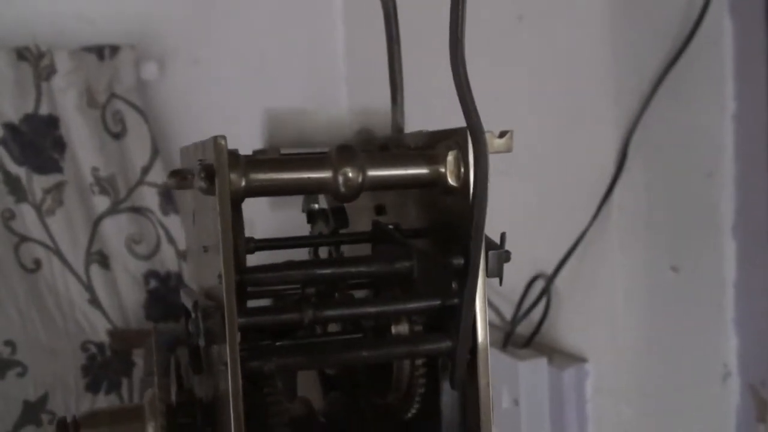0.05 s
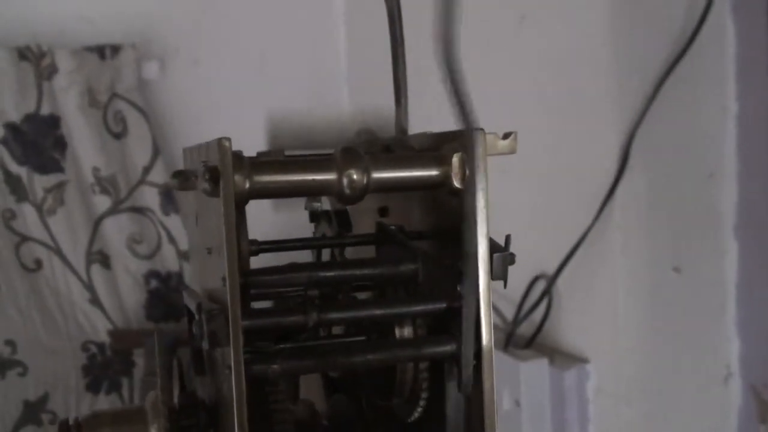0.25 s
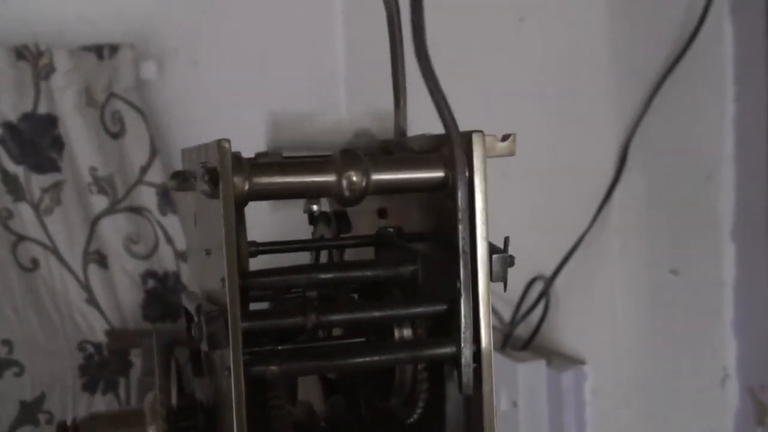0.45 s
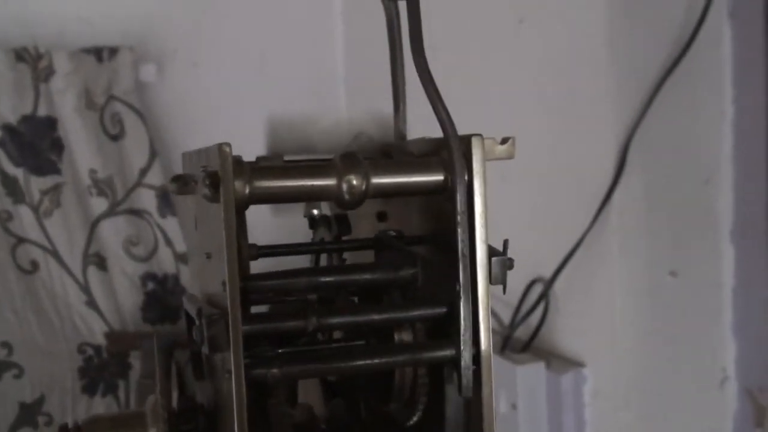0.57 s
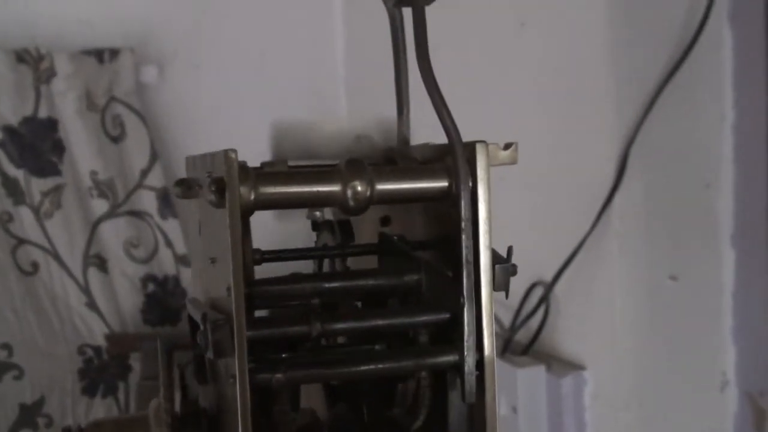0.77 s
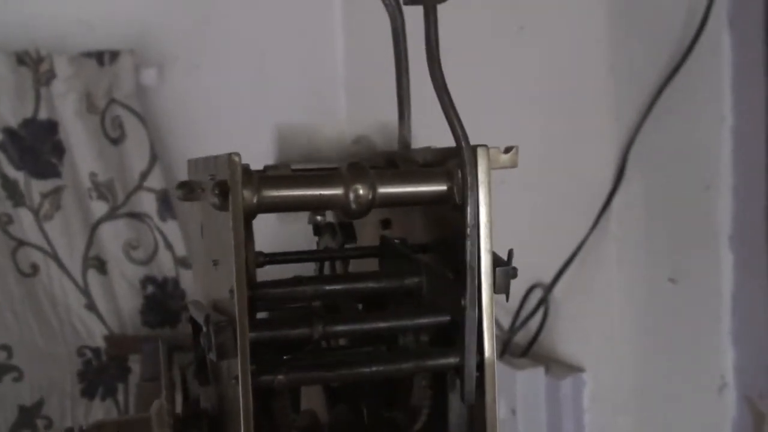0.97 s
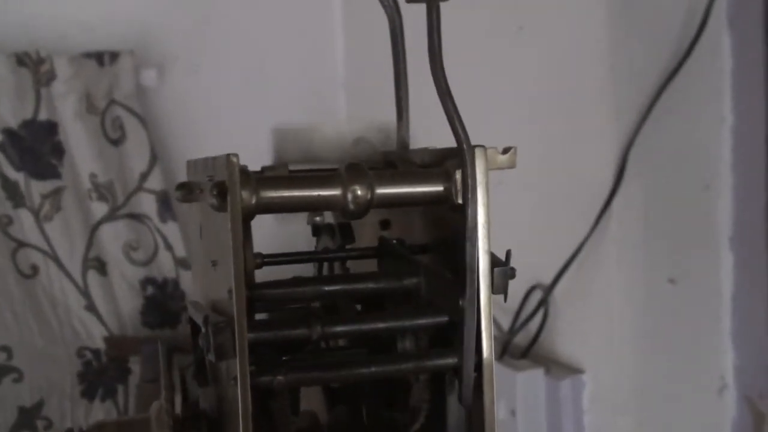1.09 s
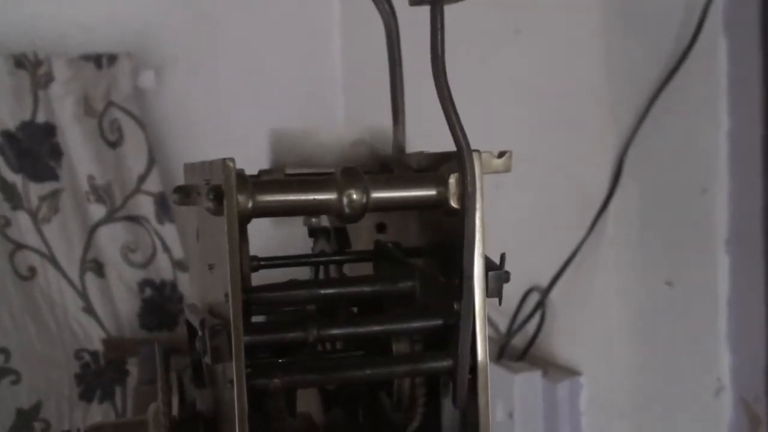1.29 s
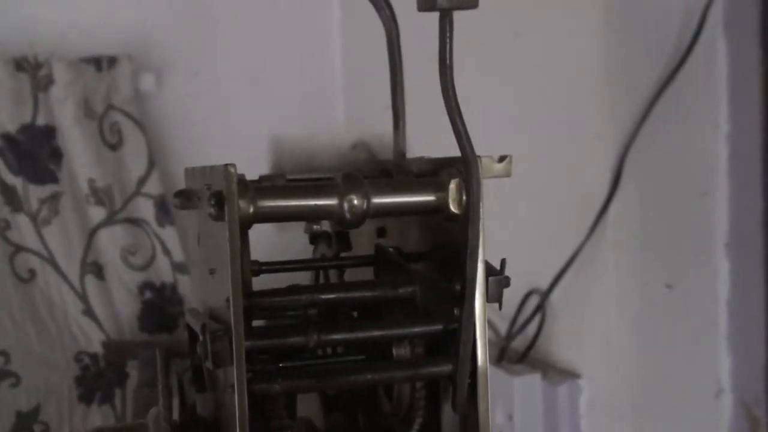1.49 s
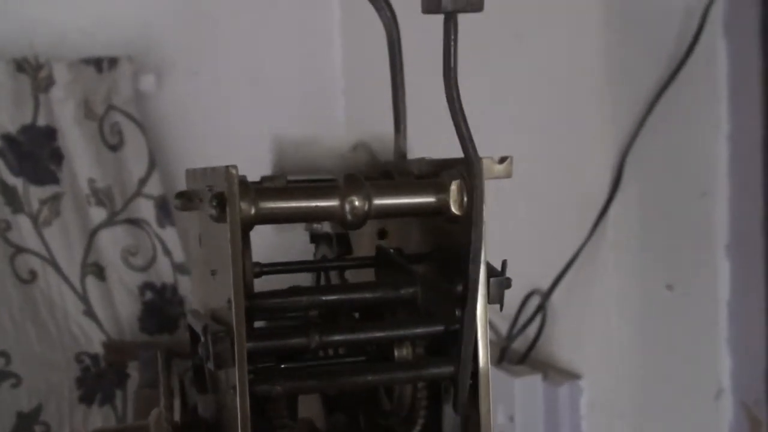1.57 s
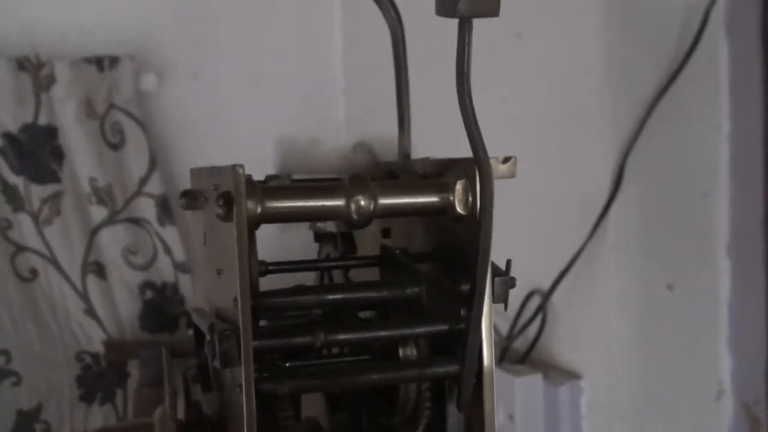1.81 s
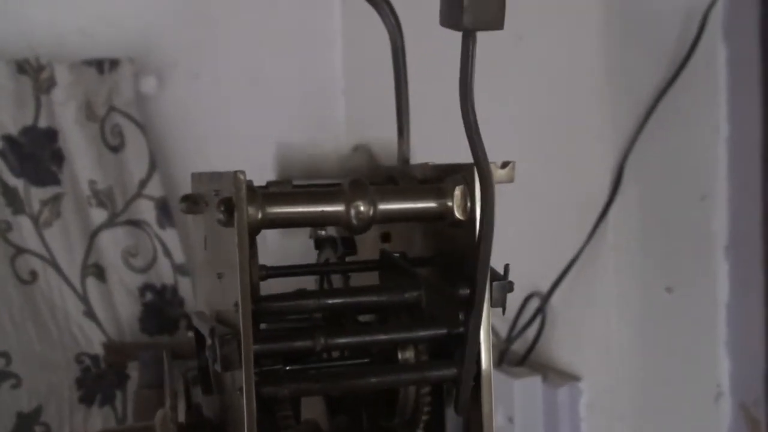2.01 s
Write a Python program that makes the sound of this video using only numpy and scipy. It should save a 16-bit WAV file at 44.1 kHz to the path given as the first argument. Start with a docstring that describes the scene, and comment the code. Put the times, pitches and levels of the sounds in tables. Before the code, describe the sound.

A clock movement runs close up in a small room, with dull ticks about every 0.26 seconds under fast, bright wheel chatter. Two hard metal clacks hit at 0.33 and 0.4 seconds. Gritty scrapes and a thin, high pivot squeal flicker most strongly from 0.3 to 1.1. Faint hollow knocks appear around 1.3 to 1.45; then the whir eases, leaving brighter tocks, small steel rings and faint hiss until 2.0.

```python
"""Loose wheels chatter and whir over a faint hiss while a clock escapement ticks, with brighter tocks.
Noise made of tiny contacts, coloured by resonances, makes the chatter, whir, rubs and scrapes.
One high tone swells: a dry pivot sings, and the rattle faintly excites the same tone.
Decaying sines make thin steel rings, the metal of two loud clacks and some soft hollow knocks.
The uneven whir gradually eases; a short diffuse tail and a second rendering give room and width."""
import sys
import numpy as np
from scipy.fft import rfft, irfft, next_fast_len
from scipy.io import wavfile

SR = 44100
rng = np.random.default_rng(int(sys.argv[2]) if len(sys.argv) > 2 else 0)


def log_audio(samples):
    """Write samples as a 16-bit WAV file to the path given in sys.argv[1]."""
    # one column per channel
    frames = np.atleast_2d(samples).T
    # limit to full scale, then quantise
    limited = np.clip(frames, -1, 1)
    pcm = np.round(limited * 32767).astype(np.int16)
    wavfile.write(sys.argv[1], SR, pcm)


N = 90404
T = np.arange(N) / SR
SIZE = next_fast_len(2 * N)  # padded, so that filter tails do not wrap round
HZ = np.maximum(np.arange(SIZE // 2 + 1) * SR / SIZE, 1)
ATTACK_S, GRAINS_PER_S, GRAIN_SPREAD_DB = 0.0013, 8000, 2


def from_db(db):
    """Logarithmic level: 20 dB is a factor of ten in amplitude."""
    return 10 ** (np.asarray(db) / 20)


def rms_one(x):
    """Normalisation: scale to unit root mean square."""
    return x / np.sqrt(np.mean(np.abs(x) ** 2) + 1e-20)


def through(x, response):
    """Linear filtering: multiply the spectrum by a frequency response."""
    return irfft(rfft(x, SIZE) * response, SIZE)[..., :N]


def colour(points):
    """Minimum phase: a causal response whose magnitude follows (pitch_hz, level_db) points."""
    hz, db = np.transpose(points)
    level_db = np.interp(np.log(HZ), np.log(hz), db)
    cepstrum = irfft(np.log(from_db(level_db)), SIZE)
    # fold the negative-time half onto the positive
    cepstrum[1:SIZE // 2] *= 2
    cepstrum[SIZE // 2 + 1:] = 0
    return np.exp(rfft(cepstrum))


def resonances(modes):
    """Modal superposition: damped oscillators (pitch_hz, width_hz, level_db) in parallel."""
    return sum(from_db(db) / (1 + 1j * (HZ ** 2 - hz ** 2) / (HZ * width)) for hz, width, db in modes)


def lifts(modes):
    """Resonant colouring: a flat response with a peak or dip at each mode."""
    return np.prod([1 + (from_db(db) - 1) * resonances([(hz, width, 0)]) for hz, width, db in modes],
                   axis=0)


def drift(rate_hz):
    """Random modulation: low-passed noise of unit rms."""
    return rms_one(through(rng.standard_normal(N), 1 / (1 + (HZ / rate_hz) ** 2) ** 2))


def grains():
    """Granular contact noise: dense random impulses of either sign and uneven size, at unit rms."""
    touch = rng.random(N) < GRAINS_PER_S / SR
    sign = rng.choice([-1, 1], N)
    return rms_one(touch * sign * from_db(GRAIN_SPREAD_DB * rng.standard_normal(N)))


def bursts(rows, t60_s, rise_s=ATTACK_S):
    """Incoherent addition: powers of (start_s, level_db, length_s) runs add, then shape the grains."""
    power = np.zeros(N)
    for start, db, length in rows:
        release = from_db(db - 60 * np.maximum(T - start - length, 0) / t60_s)
        rise = np.clip((T - start) / rise_s + .5, 0, 1)
        power += (release * rise) ** 2
    return np.sqrt(power) * grains()


def struck(start, db, t60_s, modes):
    """Free vibration: one blow sets modes (pitch_hz, level_db) ringing with exponential decay."""
    age = np.maximum(T - start, 0)
    envelope = np.minimum(age / ATTACK_S, 1) * from_db(db - 60 * age / t60_s)
    return envelope * sum(from_db(mode_db) * np.sin(2 * np.pi * (hz * age + rng.random()))
                          for hz, mode_db in modes)


# spectrum of the room's hiss and rumble: pitch_hz [Hz], relative level_db [dB]
HISS_COLOUR = [(22, 8), (32, 5), (47, 14.5), (62, 1), (125, 2), (180, -2.5), (600, 1.5), (2000, 2),
               (5000, -9), (15500, -5)]
HISS_DB = -58


def room_hiss():
    """Stationary noise: white noise takes the spectrum of the room's hiss and rumble."""
    return from_db(HISS_DB) * through(rng.standard_normal(N), rms_one(colour(HISS_COLOUR)))


# wheels chattering: start_s [s], treble level_db and mid-range level_db [dB before offsets], length_s [s]
CHATTER = [(0.03, -39.5, -72, 0.024), (0.098, -39.5, -49, 0.024), (0.129, -37, -43, 0.021),
           (0.1664, -37.5, -52, 0.013), (0.207, -34.5, -46, 0.024), (0.238, -37, -46, 0.017),
           (0.259, -34.5, -40.5, 0.015), (0.282, -30, -38, 0.0053), (0.295, -38, -58, 0.0094),
           (0.3218, -35, -31.5, 0.0047), (0.35, -30, -27.5, 0.0085), (0.373, -35.5, -40, 0.039),
           (0.434, -56, -38.5, 0.018), (0.4614, -35.5, -39.5, 0.0071), (0.469, -50, -35, 0.0048),
           (0.513, -29, -41, 0.011), (0.531, -34.5, -40, 0.024), (0.561, -34.5, -42, 0.023),
           (0.601, -30.5, -42, 0.021), (0.632, -31.5, -36.5, 0.017), (0.659, -33.5, -40, 0.017),
           (0.677, -45, -38.5, 0.0094), (0.698, -34.5, -37, 0.021), (0.74, -29.5, -57, 0.0082),
           (0.752, -33.5, -51, 0.014), (0.7777, -31, -36, 0.019), (0.812, -30, -35, 0.01),
           (0.8555, -26.5, -38, 0.005), (0.88, -34, -38.5, 0.015), (0.9117, -36.5, -41.5, 0.021),
           (0.939, -34.5, -43, 0.008), (0.959, -33.5, -45, 0.0078), (0.987, -35, -40.5, 0.0098),
           (0.997, -36.5, -40.5, 0.018), (1.026, -31, -41, 0.0095), (1.062, -33.5, -38, 0.012),
           (1.091, -33.5, -39.5, 0.015), (1.129, -34, -42, 0.0087), (1.155, -36, -42.5, 0.023),
           (1.1824, -32, -39.5, 0.011), (1.21, -35, -44.5, 0.018), (1.259, -40.5, -52, 0.02),
           (1.3063, -32, -41.5, 0.011), (1.331, -40, -40, 0.012), (1.352, -35.5, -59, 0.0067),
           (1.4078, -33.5, -49.5, 0.013), (1.448, -36.5, -42.5, 0.029), (1.482, -36.5, -43, 0.024),
           (1.535, -36, -44.5, 0.0085), (1.573, -36.5, -43, 0.0092), (1.596, -33.5, -40.5, 0.013),
           (1.6593, -31.5, -41.5, 0.01), (1.7, -40.5, -47, 0.016), (1.712, -40, -45, 0.015),
           (1.775, -41, -50, 0.021), (1.799, -33, -43.5, 0.0072), (1.833, -35, -50, 0.0056),
           (1.886, -41, -42, 0.01), (1.908, -39, -46.5, 0.023), (1.9374, -34.5, -46.5, 0.017),
           (1.968, -42.5, -43.5, 0.021), (2.0085, -38, -41.5, 0.024)]
CHATTER_TREBLE_OFFSET_DB, CHATTER_MID_OFFSET_DB, CROSSOVER_HZ = -11, -4.5, 6860
CHATTER_RISE_S, CHATTER_T60_S = 0.0058, 0.036
CHATTER_FLUTTER_DB, CHATTER_FLUTTER_HZ = 2.5, 400
# broad spectrum of the wheels: pitch_hz [Hz], relative level_db [dB]
WHEEL_COLOUR = [(100, -14), (220, -21.5), (340, -3.5), (700, -4), (1300, -3), (2000, 3.5), (2800, 0),
                (4300, 1.5), (5600, -1), (7400, -1), (8600, 0.5), (10000, 2), (11000, 0.5), (12800, -3),
                (15500, -2.5)]
# resonances of plates and wheels: pitch_hz [Hz], width_hz [Hz], lift_db [dB]
PLATE_MODES = [(1096, 20, 14.5), (1362, 12, 10), (1636, 16, 10), (2432, 79, -29), (3862, 17, 10),
               (4370, 32, 5), (4730, 27, 7.5), (5458, 29, 14.5), (5825, 40, 8), (6690, 27, 17.5),
               (10020, 240, 6)]
# extra treble resonances of the chatter: pitch_hz [Hz], width_hz [Hz], lift_db [dB]
TOOTH_MODES = [(9050, 270, 6), (9970, 280, 3.5), (9840, 78, 5.5)]
# continuous rub of the train, rising and falling: time_s [s], level_db [dB before offset]
WHIR = [(0, -45), (0.08, -55.5), (0.19, -47), (0.29, -41), (0.44, -40.5), (0.59, -46), (0.68, -44),
        (0.79, -43), (0.845, -47), (0.89, -44), (1.12, -46.5), (1.38, -47.5), (1.64, -58), (1.77, -48.5),
        (2.05, -57)]
WHIR_OFFSET_DB, WHIR_FLUTTER_DB, WHIR_FLUTTER_HZ, WHIR_TOP_HZ = -2.5, 2.5, 123, 10240


def wheels():
    """Source and resonator: contact noise of chatter and a continuous, uneven rub excites the plates."""
    body = rms_one(colour(WHEEL_COLOUR) * lifts(PLATE_MODES))
    low_power = 1 / (1 + (HZ / CROSSOVER_HZ) ** 8)
    flutter = from_db(CHATTER_FLUTTER_DB * drift(CHATTER_FLUTTER_HZ))
    treble_rows = [(s, db + CHATTER_TREBLE_OFFSET_DB, length) for s, db, _, length in CHATTER]
    middle_rows = [(s, db + CHATTER_MID_OFFSET_DB, length) for s, _, db, length in CHATTER]
    treble = flutter * bursts(treble_rows, CHATTER_T60_S, CHATTER_RISE_S)
    middle = flutter * bursts(middle_rows, CHATTER_T60_S, CHATTER_RISE_S)
    whir_db = np.interp(T, *np.transpose(WHIR)) + WHIR_OFFSET_DB
    rub = grains() * from_db(whir_db + WHIR_FLUTTER_DB * drift(WHIR_FLUTTER_HZ))
    out = through(treble, body * lifts(TOOTH_MODES) * np.sqrt(1 - low_power))
    out += through(middle, body * np.sqrt(low_power))
    return out + through(rub, body / np.sqrt(1 + (HZ / WHIR_TOP_HZ) ** 8))


# one pallet ticks, dull and short: start_s [s], level_db [dB]
TICKS = [(0.005, -45), (0.268, -49), (0.528, -46), (0.799, -45), (1.058, -44.5), (1.325, -47.5),
         (1.591, -45), (1.842, -44)]
# modes of the tick: pitch_hz [Hz], relative level_db [dB]
TICK_MODES = [(810, -6), (1650, -4), (1800, 2.5), (2690, -2.5)]
# the other pallet tocks, brighter: start_s [s], level_db [dB]
TOCKS = [(0.131, -52), (1.453, -51.5), (1.713, -48), (1.984, -50.5)]
# modes of the tock: pitch_hz [Hz], relative level_db [dB]
TOCK_MODES = [(1950, -1.5), (4230, 1), (4400, 5)]
PALLET_RING_T60_S = 0.036
PALLET_RUB_DB, PALLET_RUB_S, PALLET_RUB_T60_S, PALLET_RUB_WIDTH_HZ = -4, 0.0027, 0.07, 160


def escapement():
    """Impact and friction: each pallet landing rings its modes and rubs briefly along the tooth."""
    out = np.zeros(N)
    for beats, modes in ((TICKS, TICK_MODES), (TOCKS, TOCK_MODES)):
        rub = bursts([(s, db + PALLET_RUB_DB, PALLET_RUB_S) for s, db in beats], PALLET_RUB_T60_S)
        rub_modes = [(hz, PALLET_RUB_WIDTH_HZ, db) for hz, db in modes]
        out += through(rub, rms_one(resonances(rub_modes)))
        out += sum(struck(s, db, PALLET_RING_T60_S, modes) for s, db in beats)
    return out


# thin steel ring at some beats: start_s [s], level_db [dB], t60_s [s]
RINGS = [(0.008, -51, 0.79), (1.453, -42, 0.097), (1.591, -44, 0.1), (1.714, -42, 0.21), (1.841, -39.5, .1),
         (1.985, -48.5, 0.28)]
RING_HZ = 5300
WHEEL_RING_HZ, WHEEL_RING_DB, WHEEL_RING_T60_S = 4670, -0.5, 0.15  # level relative to the tock


def thin_ring():
    """Lightly damped modes: some beats ring a small steel part; each tock adds a second, lower ring."""
    steel = sum(struck(s, db, t60, [(RING_HZ, 0)]) for s, db, t60 in RINGS)
    wheel_modes = [(WHEEL_RING_HZ, WHEEL_RING_DB)]
    return steel + sum(struck(s, db, WHEEL_RING_T60_S, wheel_modes) for s, db in TOCKS)


# swells of one high tone, from the singing pivot or, faintly, the rattle:
# peak_s [s], level_db [dB], half_length_s [s]
TONE_SWELLS = [(0.04, -54.5, 0.024), (0.127, -51.5, 0.024), (0.293, -38, 0.017), (0.422, -40, 0.0061),
               (0.457, -48, 0.013), (0.536, -37.5, 0.018), (0.587, -41, 0.017), (0.653, -35.5, 0.013),
               (0.699, -38, 0.016), (0.757, -37, 0.018), (0.801, -43, 0.0077), (0.862, -41, 0.0079),
               (0.917, -43, 0.012), (0.963, -40.5, 0.021), (1.012, -43.5, 0.015), (1.062, -41.5, 0.011),
               (1.12, -45, 0.022), (1.233, -51, 0.017), (1.535, -55.5, 0.014), (1.291, -51.5, 0.017),
               (1.411, -53.5, 0.016), (1.466, -49.5, 0.017), (1.587, -48.5, 0.0096), (1.673, -45.5, 0.015),
               (1.951, -48, 0.0076)]
TONE_HZ, TONE_WANDER_HZ, TONE_WANDER_RATE_HZ = 6707, 9, 52.3
TONE_ROUGH_DB, TONE_ROUGH_RATE_HZ = 1.0, 200


def high_tone():
    """Excitation of one mode: a dry pivot sings by friction, and the rattle faintly excites the same tone."""
    swell = sum(from_db(db) * np.exp(-((T - peak) / half) ** 2) for peak, db, half in TONE_SWELLS)
    pitch = TONE_HZ + TONE_WANDER_HZ * drift(TONE_WANDER_RATE_HZ)
    phase = 2 * np.pi * np.cumsum(pitch) / SR
    roughness = from_db(TONE_ROUGH_DB * drift(TONE_ROUGH_RATE_HZ))
    return np.sqrt(2) * swell * roughness * np.sin(phase)  # root 2 gives the sine unit rms


# loud clacks: start_s [s], level_db [dB], length_s [s], rattle t60_s [s],
# colour as points of pitch_hz [Hz], relative level_db [dB]
CLACKS = [(0.3262, -23.5, 0.0038, 0.071, [(100, -20), (190, -18), (270, 5), (550, -3.5), (1500, -1),
          (2400, 6), (4400, 3), (7000, 11.5), (8200, 3.5), (11000, 5.5), (12500, -6), (14000, 5),
          (15500, 5)]), (0.401, -30.5, 0.0098, 0.082, [(100, -2.5), (190, -25), (290, -4), (1600, -5),
          (4400, 3.5), (7000, -1.5), (9000, 3.5), (11400, 9.5), (12400, -5.5), (15500, -0.5)])]
# what rings on, one list for each clack: pitch_hz [Hz], relative level_db [dB]
CLACK_MODES = [
    [(1075, -16.5), (2322, -6), (2408, -10), (3352, -15), (3756, -8.5), (4270, -10), (4476, -11),
     (5466, -18), (5747, -6), (6571, -19), (7212, -8), (9002, -12)],
    [(4474, -5), (9530, -8), (10282, -19), (11408, -4)],
]
CLACK_RING_T60_S = 0.084


def clacks():
    """Hard impact: two blows each give a short coloured rattle, and the struck metal rings on."""
    out = np.zeros(N)
    for (start, db, length, t60, points), modes in zip(CLACKS, CLACK_MODES):
        out += through(bursts([(start, db, length)], t60), rms_one(colour(points)))
        out += struck(start, db, CLACK_RING_T60_S, modes)
    return out


# teeth catch and scrape: start_s [s], level_db [dB], length_s [s]
SCRAPES = [(0.412, -30.5, 0.0036), (0.4775, -33, 0.0026), (0.526, -40, 0.0088), (0.668, -43.5, 0.0071),
           (0.725, -37.5, 0.0042), (0.869, -33, 0.0028), (0.896, -43.5, 0.009), (0.965, -45.5, 0.0048),
           (1.018, -44, 0.016), (1.098, -46.5, 0.011), (1.250, -49.5, 0.022), (1.330, -46, 0.0038)]
# modes of the scraped teeth: pitch_hz [Hz], width_hz [Hz], relative level_db [dB]
SCRAPE_MODES = [(3160, 2900, 1.7), (4620, 120, 13.3), (5110, 300, 13), (5463, 84, 18.7)]
SCRAPE_T60_S = 0.055


def scrapes():
    """Forced resonance: teeth catch for a moment and their contact noise drives a few modes."""
    return through(bursts(SCRAPES, SCRAPE_T60_S), rms_one(resonances(SCRAPE_MODES)))


# soft hollow knocks: start_s [s], level_db [dB], starting pitch_hz [Hz], t60_s [s]
KNOCKS = [(0.456, -48.5, 299.4, 0.13), (1.155, -58.5, 159.6, 0.6), (1.326, -52.5, 826, 0.2),
          (1.352, -53, 489, 0.23), (1.440, -52, 478, 0.23)]
# partials of a knock: multiple of the pitch [ratio], relative level_db [dB]
KNOCK_MODES = [(1, -5), (1.5, -10.5)]
KNOCK_RISE_S, KNOCK_SAG_HZ_PER_S, KNOCK_FLUTTER_DB = 0.007, 446, 2.5  # sag of the lowest partial


def knocks():
    """Decaying partials with a falling pitch: each faint knock swells, sags and dies unevenly."""
    out = np.zeros(N)
    for start, db, hz, t60 in KNOCKS:
        age = np.maximum(T - start, 0)
        rise = np.minimum(age / KNOCK_RISE_S, 1)
        decay_db = -60 * np.maximum(age - KNOCK_RISE_S, 0) / t60
        envelope = rise * from_db(db + decay_db + KNOCK_FLUTTER_DB * drift(hz / 2))
        cycles = hz * age - .5 * KNOCK_SAG_HZ_PER_S * age ** 2 / (2 * np.pi) + rng.random() / (2 * np.pi)
        cycles = hz * age - .5 * KNOCK_SAG_HZ_PER_S * age ** 2 + rng.random()
        phase = 2 * np.pi * cycles
        out += envelope * sum(from_db(mode_db) * np.sin(k * phase) for k, mode_db in KNOCK_MODES)
    return out


ROOM_T60_S, ROOM_DB = 0.12, -12.5


def reflections(x, t60_s):
    """Diffuse reverberation: convolution with exponentially dying noise of unit energy."""
    tail = rng.standard_normal(N) * from_db(-60 * T / t60_s)
    return through(x, rfft(tail / np.linalg.norm(tail), SIZE))


def movement_in_room():
    """Superposition: the wheels, beats and blows add to their room tail and the hiss."""
    works = wheels() + escapement() + clacks() + scrapes() + knocks()
    return works + from_db(ROOM_DB) * reflections(works, ROOM_T60_S) + room_hiss()


# stereo width by frequency: pitch_hz [Hz], side level relative to mid_db [dB]
WIDTH = [(60, -24), (160, -4), (450, -6.5), (740, -7.5), (2010, -12.5), (3330, -25), (5500, -14),
         (8800, -14), (10500, -4.5), (11800, -27.5)]


def scene():
    """Mid-side stereo: a central movement, and a weaker rendering with other random draws as width."""
    mid = movement_in_room() + thin_ring() + high_tone()
    side = through(movement_in_room(), colour(WIDTH))
    return (mid + side * [[1], [-1]]) * from_db([[.2], [-.2]])  # left slightly louder


CUTOFF_HZ = 15750


def record(dry):
    """Low-pass filtering: the top is cut steeply."""
    return through(dry, 1 / np.sqrt(1 + (HZ / CUTOFF_HZ) ** 400))


dry = scene()
out = record(dry)
log_audio(out)
```